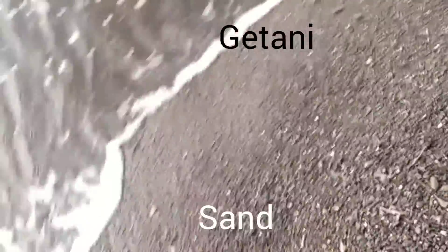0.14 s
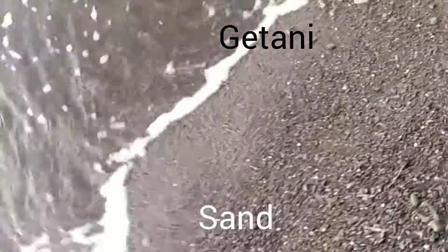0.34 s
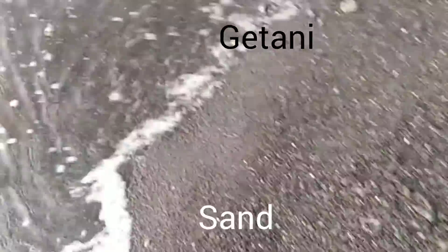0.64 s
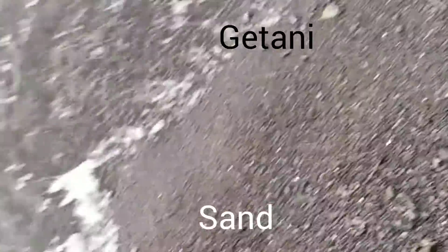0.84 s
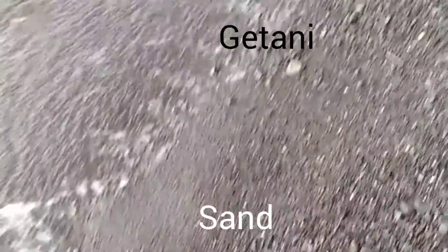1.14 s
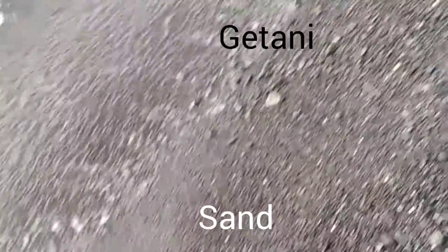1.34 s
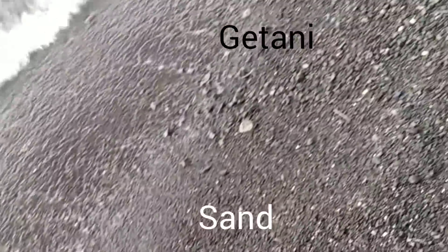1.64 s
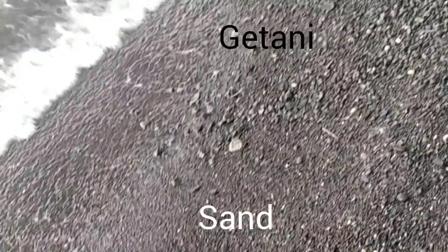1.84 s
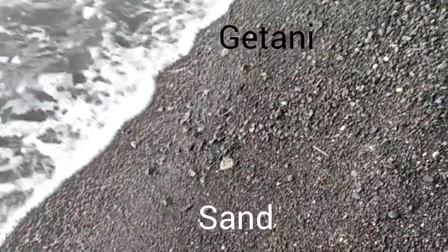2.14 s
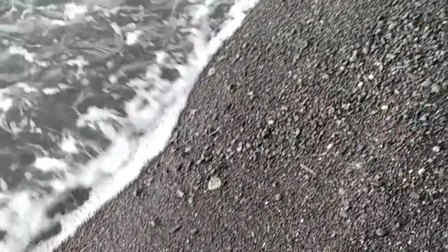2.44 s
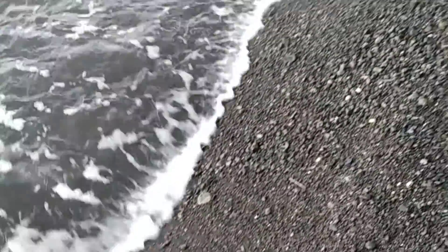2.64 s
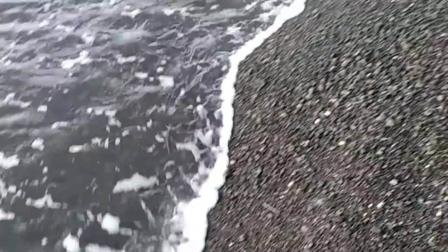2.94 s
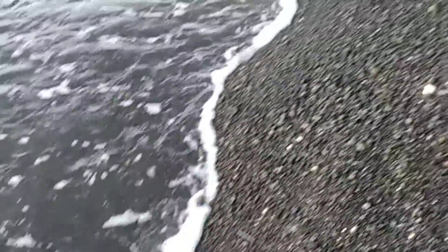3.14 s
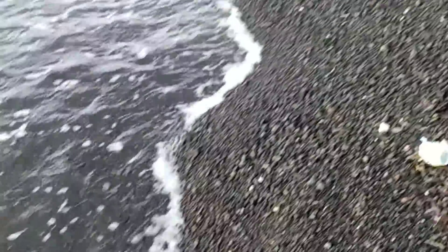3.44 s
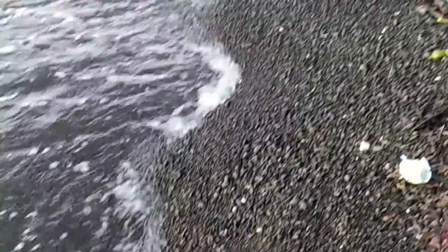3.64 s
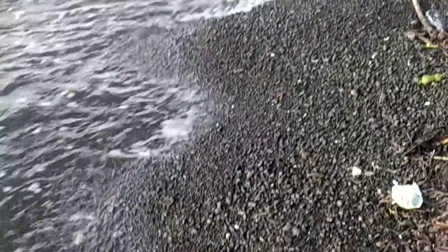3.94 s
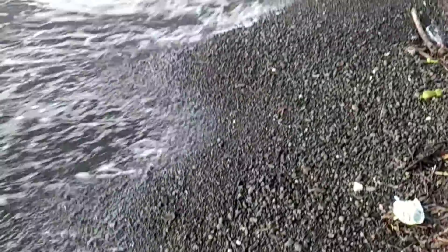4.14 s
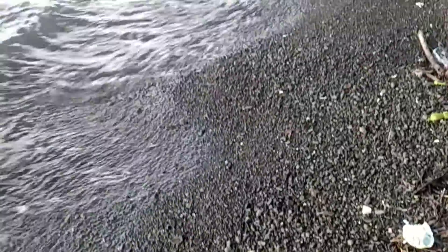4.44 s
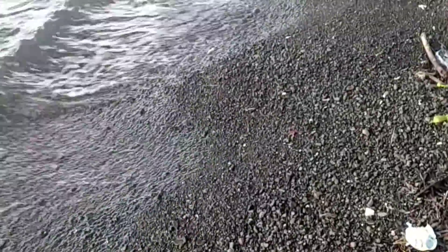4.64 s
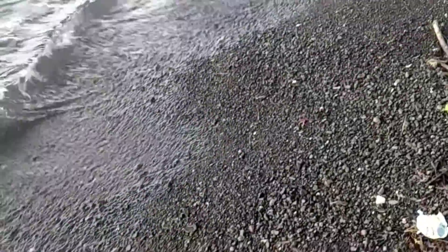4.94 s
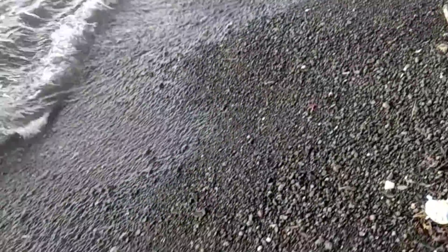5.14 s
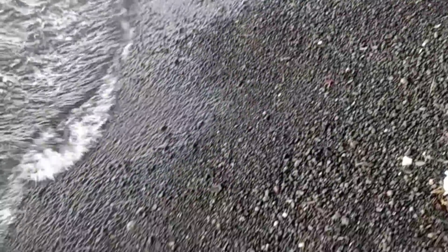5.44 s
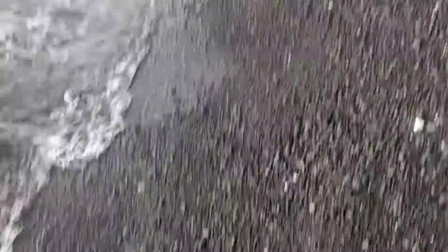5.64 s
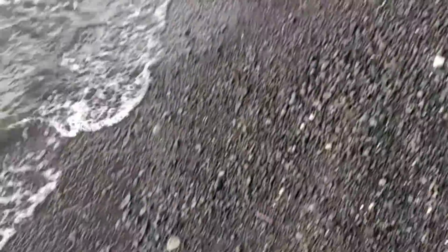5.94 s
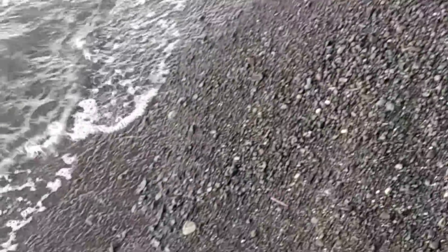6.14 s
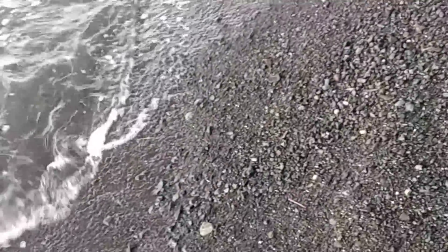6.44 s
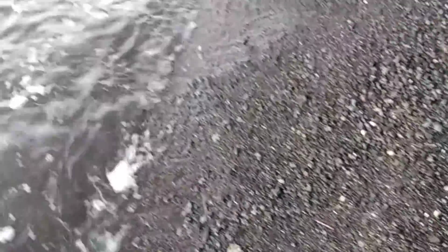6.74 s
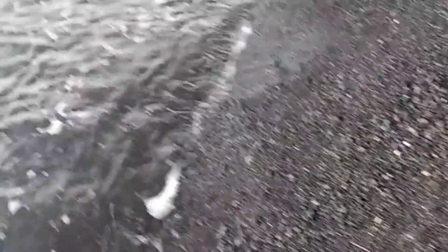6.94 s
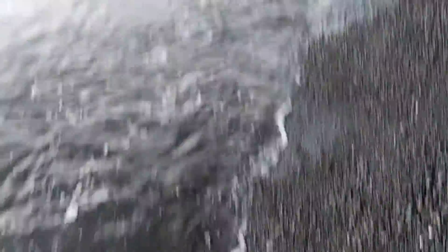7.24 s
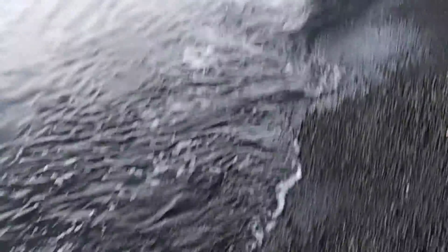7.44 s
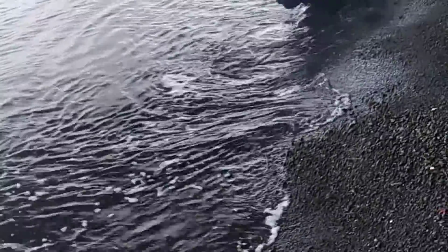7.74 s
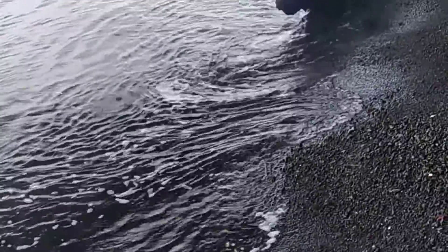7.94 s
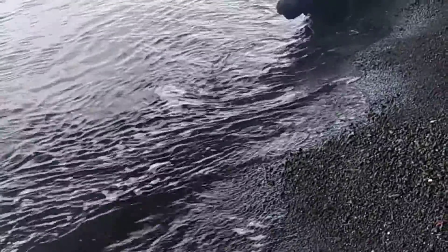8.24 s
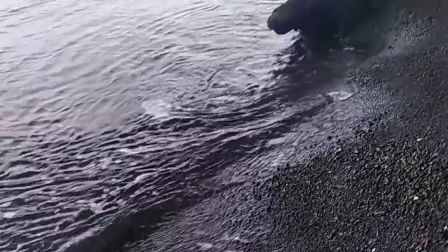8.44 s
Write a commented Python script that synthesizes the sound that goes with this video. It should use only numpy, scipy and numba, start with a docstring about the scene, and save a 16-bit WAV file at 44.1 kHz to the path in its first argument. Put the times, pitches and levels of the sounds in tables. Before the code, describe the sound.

Small waves wash over a pebble beach, heard close and in stereo, bubbling and fizzing with ticking grit. A small bird chirps faintly on the right during the first second. The water builds from the left at about 1 second, gulping, and peaks on the right at 1.6 seconds with one short, sharp click. The wash continues until about 3 seconds, then ebbs with a soft gurgle, rustling stones and a few light pebble knocks. Soft, dull low thuds come between 3.4 and 5.3 seconds. Another wave splashes in from 5 to 5.6 seconds with plops and rattling stones, followed by smaller ones around 6.3 and 7 seconds. The bird chirps again from 7 to 7.6 seconds, a thin trickle runs until 8, and a last small wave arrives at 8.5. A quiet hush of sea and a faint low drone lie underneath throughout.

```python
"""Small waves on a pebble beach

A stereo pair at the water's edge. Waves run up from the left or the right as swarms of ringing bubbles
and ticking grit; trapped air gulps or bursts with a click. Stones rustle, rattle and knock, the ebb
gurgles and a runnel trickles. A small bird chirps over a few dull thuds, the hush of the sea farther
along and a faint low drone."""
import sys
import numpy as np
from scipy import signal
from scipy.fft import rfft, irfft, next_fast_len
from scipy.io import wavfile
from scipy.ndimage import map_coordinates
from numba import njit

SR = 44100
rng = np.random.default_rng(int(sys.argv[2]) if len(sys.argv) > 2 else 0)


def transcribe(signal):
    """Save signal, clipped to [-1, 1], as a 16-bit WAV file at the path in sys.argv[1]."""
    frames = np.atleast_2d(signal).T
    limited = np.clip(frames, -1, 1)
    pcm = np.round(limited * 32767).astype(np.int16)
    wavfile.write(sys.argv[1], SR, pcm)


N = 379260
TIME = np.arange(N) / SR
CLOCK = np.arange(0, N / SR + .002, .002)   # coarse time for the envelopes, s

# Each rush of water up the stones: crest_s, foam_db, rise_db_per_s, fall_db_per_s,
# extra_churn_db, extra_splash_db, extra_grit_db, left_lead_ms, front_width_ms
RUSHES = [(.04, -57.5, 100, 50, 1.5, 6.5, 2, 0.25, 0.045), (.33, -48.5, 95, 50, 2, -3, 3.5, 0.36, .05),
          (.47, -45, 90, 7.5, 2.5, 5, -4, 0.27, .04), (.8, -48, 40, 25, -3, 8, -2, .27, .04),
          (1.02, -35.5, 32, 17, -3, 0, 2, 0.27, 0.039), (1.14, -34, 60, 12.5, -1, 0.8, 1, .23, .16),
          (1.32, -31, 47, 16.5, 0, 0.5, 0, .05, 0.29), (1.58, -27.8, 110, 36, 1, 2.5, 0, -0.35, .07),
          (1.89, -32.5, 99, 22.5, 3, 3, -5, -0.33, 0.05),
          (2.37, -36.5, 17.5, 15, 3.5, -1.2, 3.5, -0.35, 0.058),
          (2.96, -43, 19.5, 28, 1.5, 0.2, -3.5, -0.34, 0.073),
          (4.4, -51.3, 2.5, 13, -1, -7, 3.5, -0.25, 0.14),
          (5.0, -36, 32.5, 21.5, -0.5, 1.1, 0.5, 0.2, 0.055),
          (5.41, -36.5, 35, 11.5, -.5, 0.4, -2, .19, 0.15), (6.34, -37, 34, 30, -0.3, 2.3, 0.5, 0.34, 0.03),
          (7.06, -40, 17, 18, -3, 1.2, -4, 0.3, 0.025), (7.58, -46.5, 22, 25, 1, -3, -8.5, 0.1, 0.06),
          (8.58, -42, 108, 20, -4, -3, 2, .26, 0.056)]


def surf():
    """Big bubbles churn, smaller ones splash and plink, foam fizzes and grit ticks as it is rolled."""
    # Spectra of the four layers: frequency_hz, level_db
    churn_colour = [(65, -28), (115, -18), (168, -6), (250, 0.5), (340, 3.5), (420, -3), (520, -54),
                    (800, -24)]
    splash_colour = [(250, -32), (380, -1.5), (480, -2), (620, -2), (900, 0.5), (1220, -0.5), (1500, -12.5),
                     (2100, -22)]
    foam_colour = [(900, -13), (1400, -1), (1650, -1), (1950, -0.5), (2320, 1), (2850, -3.5), (3400, -4),
                   (4000, -2), (4680, -5), (4900, -16.5), (6000, -19), (9000, -27)]
    grit_colour = [(3000, -22), (4800, 4.5), (5600, -5), (6800, 4.5), (8200, 2.5), (10700, 4), (12300, 0.5),
                   (14200, -3)]
    churn = swarm(churn_colour, 94.5, 515, per_s=850, cycles=8, rise=.061,
                  spread_db=2.5, blur=.035, surge_db=.7, scatter_ms=.07)
    splash = swarm(splash_colour, 378, 1682, per_s=1800, cycles=16.5, rise=.066,
                   spread_db=2, blur=.16, surge_db=.5, scatter_ms=.03, clump_db=2.2)
    plinks = swarm(splash_colour, 500, 2100, per_s=100, cycles=70, rise=.05,
                   spread_db=3.5, blur=0, surge_db=1, scatter_ms=.1)
    foam = swarm(foam_colour, 1302, 4920, per_s=3500, cycles=21, rise=.046,
                 spread_db=1.5, blur=.36, surge_db=.6, scatter_ms=.029, clump_db=1.8)
    grit = swarm(grit_colour, 4700, 14500, per_s=6000, cycles=8, rise=0,
                 spread_db=4, blur=.55, surge_db=.8, scatter_ms=.05)
    bubbling = splash + from_db(-11) * plinks
    *_, churn_db, splash_db, grit_db, _, _ = np.transpose(RUSHES)[:, :, None]
    return (churn * envelope(swells(RUSHES, churn_db - 8.5, fall_factor=1.32))
            + bubbling * envelope(swells(RUSHES, splash_db - 4, fall_factor=1.26))
            + foam * envelope(swells(RUSHES))   # the foam lingers longest
            + grit * envelope(swells(RUSHES, grit_db - 10.5, fall_factor=1.1)))


def gulps():
    """Large air pockets gulp where the loudest rush is; bigger, lower ones swell more slowly."""
    # Trapped air: start_s, pitch_hz, level_db
    pockets = [(1.115, 420, -28), (1.122, 620, -27), (1.138, 295, -26), (1.146, 560, -28),
               (1.162, 363, -27), (1.552, 290, -32), (1.571, 155, -28.5), (1.885, 160, -32.5),
               (1.909, 270, -34), (1.924, 167, -32), (2.399, 1280, -33), (2.944, 315, -39),
               (3.223, 1060, -41), (3.975, 185, -47), (4.29, 315, -43), (4.40, 1080, -45),
               (4.446, 265, -41), (4.555, 900, -45), (4.652, 930, -41), (4.661, 510, -40),
               (4.885, 1180, -29), (4.902, 900, -37), (4.92, 1120, -36), (5.003, 1220, -36),
               (5.04, 690, -35), (5.085, 430, -36), (5.114, 1260, -37), (5.327, 2240, -34),
               (5.371, 1610, -36), (5.466, 1110, -35), (5.479, 1170, -28.3), (5.536, 1330, -30),
               (5.588, 2050, -36), (6.28, 950, -38), (6.311, 240, -32), (6.356, 725, -35),
               (6.642, 665, -36), (6.853, 670, -39), (6.982, 835, -37), (8.443, 620, -53),
               (8.458, 940, -50), (8.469, 740, -49), (8.496, 960, -47), (8.541, 276, -37)]
    loudest_rush = rush_shares().argmax(axis=0)
    *_, leads_ms, _ = np.array(RUSHES)[loudest_rush].T
    return sum(blip(s, hz, db, swell_s=.0078 * (300 / hz) ** .29, lead_ms=np.interp(s, CLOCK, leads_ms))
               for s, hz, db in pockets)


def bursts():
    """Air pockets burst with a click, and the torn surface adds a short crack."""
    # Bursting pockets: start_s, pitch_hz, level_db, left_lead_ms
    pockets = [(1.5555, 930, -22, -.3), (1.5595, 548, -16, -0.42), (1.5645, 950, -21, -.35),
               (1.5693, 710, -4.5, -0.32), (1.5735, 590, -19, -0.47), (1.5803, 800, -19.5, -.19),
               (1.604, 870, -23, -.35), (8.5415, 500, -28, 0.49)]
    # Ring of the torn surface: pitch_hz, relative_db
    crack_modes = [(1450, -14), (1900, -13), (2500, -19)]
    pops = sum(blip(s, hz, db, swell_s=.0012, lead_ms=lead) for s, hz, db, lead in pockets)
    cracks = sum(blip(s, hz, db + crack_db, swell_s=.0008, lead_ms=lead)
                 for s, _, db, lead in pockets for hz, crack_db in crack_modes)
    low_cut = signal.butter(2, 170, "high", fs=SR, output="sos")   # the clicks carry no deep thump
    return signal.sosfilt(low_cut, pops + cracks)


def across_the_shore(water):
    """The left side hears the water with peaks and dips that shift as it passes from side to side; the right
    side colours water on its own side."""
    # Colour on the left, by where the water is: frequency_hz, from_right_db, from_ahead_db, from_left_db
    left_colours = [(300, 0, 0, 0), (430, -2.5, -.5, 0), (520, -6, -5, 2.3), (620, -7, -3, .5),
                    (750, -5, -2, 1), (1000, 0, .5, 0), (1240, 2, 2, -1), (1420, -1, 2, -.5),
                    (1650, -3.5, 1.5, .5), (1900, -1.5, 1, -3.5), (2120, 0, .5, 1), (2300, .5, 1, 3),
                    (2600, 0, -.5, 0), (4500, 0, 0, 0), (5700, -1.5, -1.5, -2), (6700, 0, .5, .5),
                    (12000, -.5, .5, .5)]
    # Colour on the right for water on that side: frequency_hz, gain_db
    right_colour = [(270, 1.5), (370, -3), (460, 0), (550, 4), (680, .5), (830, -1.5), (1100, .5),
                    (1550, -1), (2300, .5), (4500, .5), (7000, -.5), (9500, 0), (13000, 4.5)]
    shares = side_shares()
    hz, *sides_db = np.transpose(left_colours)
    left = sum(share * coloured(water[0], np.transpose([hz, db])) for share, db in zip(shares, sides_db))
    right = (1 - shares[0]) * water[1] + shares[0] * coloured(water[1], right_colour)
    return np.array([left, right])


def backwash(seep_per_s=3000, seep_blur=.23):
    """Small stones rustle as the water leaves, and tiny bubbles prickle in the wet grit underfoot."""
    # Draining between the waves: crest_s, level_db, rise_db_per_s, fall_db_per_s
    drains = [(.4, -57.5, 25, 1), (3.3, -55, 9, 1.5), (5.1, -55, 10, 15), (7.7, -61, 17, 8)]
    # Spectra of the stones and the bubbles: frequency_hz, level_db
    rustle_colour = [(1500, -35), (1900, -1), (2200, -2), (2400, 1), (2700, -10), (3200, -23)]
    seep_colour = [(6000, -12), (8500, -9.5), (9700, -3), (10800, -3), (12300, -3), (14200, -8.5)]
    rustle = swarm(rustle_colour, 1830, 2950, per_s=960, cycles=28, rise=0,
                   spread_db=5.5, blur=.12, surge_db=1.5, scatter_ms=.12)
    sizes = from_db(np.minimum(rng.exponential(1, N), 4)) * rng.choice([-1, 1], N)
    pops = rms_one(sizes * (rng.random(N) < seep_per_s / SR))   # straight below: both sides at once
    hiss = rng.standard_normal((2, N))
    seep = in_band(np.sqrt(1 - seep_blur) * pops + np.sqrt(seep_blur) * hiss, seep_colour)
    return envelope(swells(drains)) * (from_db(-4) * rustle + seep)


def rattle():
    """Rolling stones of one size clink together with a hollow ring, mostly to the left."""
    # Patches rolling in the wash: crest_s, level_db, rise_db_per_s, fall_db_per_s
    patches = [(2.7, -52, 20, 14), (3.45, -56, 25, 35), (5.05, -46, 60, 45), (5.42, -47, 70, 16),
               (6.44, -48, 60, 45), (6.92, -49, 35, 18), (7.34, -50, 45, 70)]
    # Spectrum of the clinks: frequency_hz, level_db
    colour = [(1950, -20), (2200, -2), (2330, 0), (2480, -3), (2750, -20)]
    clinks = swarm(colour, 2100, 2600, per_s=500, cycles=45, rise=0,
                   spread_db=3, blur=.1, surge_db=1.5, scatter_ms=.1)
    return clinks * envelope(swells(patches)) * from_db([[0], [-4]])


def pebbles():
    """The backwash tips a few larger stones against their neighbours."""
    # Single knocks: start_s, level_db
    knocks = [(3.522, -40), (3.904, -39), (3.908, -38), (4.389, -43), (4.461, -46), (4.515, -46)]
    # Ring of a knocked pebble: pitch_hz, level_db, t60_s
    modes = [(1770, -8, .012), (2370, -3, 0.017), (4130, -3, 0.0089)]
    touches, age = np.zeros(N), TIME[:SR // 20]
    for s, db in knocks:
        touches[int(s * SR)] = from_db(db)
    ring = sum(from_db(db - 60 * age / t60) * np.sin(2 * np.pi * hz * age) for hz, db, t60 in modes)
    return signal.fftconvolve(touches, ring)[:N]


def ebb():
    """Bubbles ring in the gaps between the stones as a thin sheet of water sinks away."""
    # Spells of gurgling: crest_s, level_db, rise_db_per_s, fall_db_per_s
    gurgles = [(3.45, -57, 12, 4), (4.35, -56, 8, 12)]
    # Hollow spectrum of the gaps: frequency_hz, level_db
    colour = [(220, -5), (300, 3), (450, -16), (560, -2), (670, 1), (800, -4), (1000, -1), (1200, -1),
              (1450, -16)]
    bubbles = swarm(colour, 220, 1350, per_s=900, cycles=18, rise=.05,
                    spread_db=2, blur=.12, surge_db=.7, scatter_ms=.12, clump_db=2.5)
    return bubbles * envelope(swells(gurgles))


def trickle():
    """A thin runnel tinkles with small, sparse bubbles."""
    # The last water running off the stones: crest_s, level_db, rise_db_per_s, fall_db_per_s
    runs = [(7.56, -54, 60, 45), (7.71, -53.5, 110, 70), (7.97, -57.5, 30, 40)]
    # Spectrum of the runnel: frequency_hz, level_db
    colour = [(1000, -14), (1300, -1), (1650, 0), (2050, -1), (2400, -16)]
    bubbles = swarm(colour, 1150, 2300, per_s=420, cycles=34, rise=.06,
                    spread_db=3, blur=.08, surge_db=1, scatter_ms=.1)
    return bubbles * envelope(swells(runs))


def bird(echo_db=-2, shore_t60_s=.38):
    """Short gliding whistles off to the right, some raspy, scattered back by the rocky shore."""
    # Chirps, the one at 0.483 s a faint echo of the one before: start_s, length_s, first_hz, last_hz, level_db,
    # flutter_hz, left_minus_right_db
    chirps = [(.139, 0.018, 3640, 3540, -35.5, 10, -4), (.155, .012, 3570, 3500, -41, 15, 0),
              (0.434, 0.022, 4400, 4330, -38, 70, -5), (.462, 0.024, 4290, 3980, -37, 70, -2),
              (.483, 0.05, 4010, 4060, -43.5, 29, -9), (0.812, .05, 4060, 3800, -38.5, 200, -9),
              (7.009, 0.055, 4330, 4520, -42, 90, -12), (7.048, 0.025, 3890, 3910, -41, 50, -8),
              (7.448, 0.03, 4350, 4170, -39, 110, -4), (7.474, .1, 4190, 4200, -46.5, 115, -4),
              (7.582, .03, 4270, 4150, -46.5, 130, -2)]
    song, flutter = np.zeros((2, N)), drift(per_s=250)
    for s, length, first_hz, last_hz, db, flutter_hz, pan_db in chirps:
        on = np.flatnonzero((TIME > s) & (TIME < s + length))
        along = (TIME[on] - s) / length
        hz = first_hz + (last_hz - first_hz) * along + flutter_hz * flutter[on]
        gains = from_db(db + pan_db / 2 * np.array([[1], [-1]]))
        song[:, on] += gains * np.sin(np.pi * along) * np.sin(2 * np.pi * np.cumsum(hz) / SR)
    age = TIME[:SR // 2]
    echoes = rng.standard_normal((2, len(age))) * from_db(-60 * age / shore_t60_s)
    echoes /= np.sqrt(np.sum(echoes ** 2, axis=1, keepdims=True))
    return song + from_db(echo_db) * signal.fftconvolve(song, echoes, axes=1)[:, :N]


def thuds(rumble_db=-14, rumble_swell_s=.018):
    """Soft low buffets, each a bump in a longer puff of rumble, mostly on the left."""
    # Buffets: start_s, pitch_hz, level_db
    buffets = [(3.404, 130, -49), (3.455, 92, -52), (3.595, 90, -49), (3.747, 118, -41), (4.73, 100, -46),
               (4.945, 90, -49), (5.041, 92, -45), (5.31, 100, -45.5)]
    # Spectrum of the rumble: frequency_hz, level_db
    colour = [(38, -20), (58, -4), (80, 0), (120, -2), (180, -16)]
    start_s, _, level_db = np.transpose(buffets)[:, :, None]
    stage = np.maximum(CLOCK - start_s, 0) / rumble_swell_s
    puffs = envelope((from_db(level_db + rumble_db) * stage * np.exp(1 - stage)) ** 2)
    rumble = puffs * in_band(rng.standard_normal(N), colour)
    bumps = sum(blip(s, hz, db, swell_s=.007, lead_ms=0) for s, hz, db in buffets)
    return (rumble + bumps) * from_db([[0], [-6]])


def background():
    """The hush of the sea farther along, and a low wavering drone like a distant engine."""
    # Spectrum of the far surf: frequency_hz, level_db
    colour = [(25, -21), (55, -6.5), (80, 1.5), (125, 5), (200, 6.5), (320, -2), (450, -4.5), (700, -3.5),
              (1100, -4.5), (1600, -5.2), (2350, -7), (4600, -1), (5000, -15), (14200, -9.5)]
    hush = from_db(-55) * in_band(rng.standard_normal((2, N)), colour)
    drone_hz = 89.5 + 4.5 * drift(per_s=5)
    return hush + from_db(-64.2) * np.sin(2 * np.pi * np.cumsum(drone_hz) / SR)


def swarm(colour, low_hz, high_hz, per_s, cycles, rise, spread_db, blur, surge_db, scatter_ms,
          clump_db=0):
    """Bubbles or stones ring at random; `blur` is the share of power from countless farther ones."""
    born = np.flatnonzero(rng.random(N) < per_s / SR)
    pitch, size, place = rng.random((N, 3))[born].T
    hz = low_hz + (high_hz - low_hz) * pitch
    # Grains close in pitch and time grow loud together.
    pitch_zones, clumps_per_s = 9, 22
    clump_grid = rng.standard_normal((pitch_zones + 1, int(N / SR * clumps_per_s) + 2))
    clumps = map_coordinates(clump_grid, [pitch * pitch_zones, born / SR * clumps_per_s], order=1)
    size_db = spread_db * np.minimum(-np.log(1 - size), 4) + clump_db * np.minimum(clumps, 1)
    sizes = np.sqrt(hz) * from_db(size_db) * rng.choice([-1, 1], N)[born]
    # Each grain takes its direction from a rush; louder rushes own more grains.
    borders = np.cumsum(rush_shares(), axis=0)[:-1, np.searchsorted(CLOCK, born / SR)]
    rush = (place > borders).sum(axis=0)
    *_, lead_ms, width_ms = np.array(RUSHES)[rush].T
    lead = (lead_ms + np.hypot(width_ms, scatter_ms) * rng.standard_normal(N)[born]) * SR / 1000
    steps = 2 * np.pi * hz / SR
    grains = np.array([ring_all(born + side * lead / 2, steps, sizes, float(cycles), float(rise), N)
                       for side in (-1, 1)])
    near = np.sqrt(1 - blur) * in_band(grains, colour)
    far = np.sqrt(blur) * in_band(rng.standard_normal((2, N)), colour)
    spurts = from_db(surge_db * drift(per_s=11.8))   # the water arrives unevenly
    return rms_one((near + far) * spurts)


@njit
def ring_all(starts, steps, sizes, cycles, rise, length):
    """Sum of sines that die in about `cycles` turns; `rise` bends their pitch upward."""
    out = np.zeros(length)
    for k in range(len(starts)):
        life = cycles * 2 * np.pi / steps[k]
        for i in range(max(int(starts[k]) + 1, 0), min(int(starts[k] + life), length)):
            age = i - starts[k]
            phase = steps[k] * age * (1 + rise * age / life)
            out[i] += sizes[k] * np.exp(-5 * age / life) * np.sin(phase)
    return out


def blip(start_s, hz, db, swell_s, lead_ms, rise=.042):
    """A tone that swells and dies while its pitch rises, reaching the left `lead_ms` earlier."""
    out, span = np.zeros((2, N)), slice(int(start_s * SR), int((start_s + .2) * SR))
    age = np.maximum(TIME[span] - start_s + np.array([[1], [-1]]) * lead_ms / 2000, 0)
    stage = age / swell_s
    phase = 2 * np.pi * hz * age * (1 + rise * stage / 2)
    out[:, span] = from_db(db) * (stage * np.exp(1 - stage)) ** 2 * np.sin(phase)
    return out


def swells(rows, extra_db=0, fall_factor=1):
    """Power of each swell along CLOCK: it climbs to its crest and dies away at steady rates in dB."""
    crest_s, db, rise, fall = np.transpose(rows)[:4, :, None]
    age = CLOCK - crest_s
    return from_db(db + extra_db + np.minimum(rise * age, -fall_factor * fall * age)) ** 2 + 1e-20


def envelope(powers):
    """Gain of all the swells together, at every sample."""
    return np.interp(TIME, CLOCK, np.sqrt(powers.sum(axis=0)))


def rush_shares():
    """The share of each rush in the sound of the water, along CLOCK."""
    powers = swells(RUSHES)
    return powers / powers.sum(axis=0)


def side_shares(blend_ms=.08):
    """How much of the water is on the right, ahead and on the left, at every sample."""
    side_leads_ms = np.array([[-.33], [.1], [.29]])
    *_, lead_ms, width_ms = np.transpose(RUSHES)
    nearness = np.exp(-((lead_ms - side_leads_ms) / np.hypot(width_ms, blend_ms)) ** 2 / 2) + 1e-12
    shares = nearness / nearness.sum(axis=0) @ rush_shares()
    return [np.interp(TIME, CLOCK, share) for share in shares]


def drift(per_s):
    """Smooth random wander that changes about `per_s` times a second; spread 1."""
    hop, settle = 40, 2000
    pole = np.exp(-2 * np.pi * per_s * hop / SR)
    noise = rng.standard_normal(N // hop + settle + 2)
    slow = signal.lfilter([1], [1, -2 * pole, pole * pole], noise)[settle:]
    return np.interp(np.arange(N) / hop, np.arange(len(slow)), rms_one(slow))


def coloured(x, points):
    """Give x a (frequency_hz, gain_db) response."""
    size = next_fast_len(N + 8192)
    hz, db = np.transpose(points)
    bins_hz = np.maximum(np.arange(size // 2 + 1) * SR / size, 1)
    gain = from_db(np.interp(np.log(bins_hz), np.log(hz), db))
    return irfft(rfft(x, size) * gain, size)[..., :N]


def in_band(x, points):
    """Colour x and close the band an octave beyond its ends; rms 1."""
    return rms_one(coloured(x, [(points[0][0] / 2, -90), *points, (points[-1][0] * 2, -90)]))


def from_db(db):
    """Decibels to gain."""
    return 10 ** (np.asarray(db) / 20)


def rms_one(x):
    """Scale to unit power."""
    return x / np.sqrt(np.mean(x ** 2) + 1e-20)


def scene():
    """Everything heard at the water's edge."""
    water = across_the_shore(surf() + gulps() + bursts()) + backwash() + ebb() + trickle()
    return water + thuds() + pebbles() + bird() + background() + rattle()


def record(dry, cutoff_hz=14400):
    """The right microphone lacks bass and top; both lose the deepest bass and highest treble."""
    # Right microphone against the left: frequency_hz, gain_db
    right_mic = [(60, -12.5), (380, -17), (460, -2.5), (620, 2.5), (950, -3.5), (1250, -2), (1750, -1.5),
                 (2350, -5.5), (2950, -0.5), (4400, 0), (5600, 7), (6500, 2), (7600, -2), (9500, -15.5),
                 (14000, -15)]
    pair = np.array([dry[0], coloured(dry[1], right_mic)])
    pair = coloured(pair, [(20, -12), (45, 3.5), (70, -1), (100, 0)])
    return signal.sosfilt(signal.ellip(12, .2, 70, cutoff_hz, fs=SR, output="sos"), pair)


dry = scene()
out = record(dry)
transcribe(out)
```